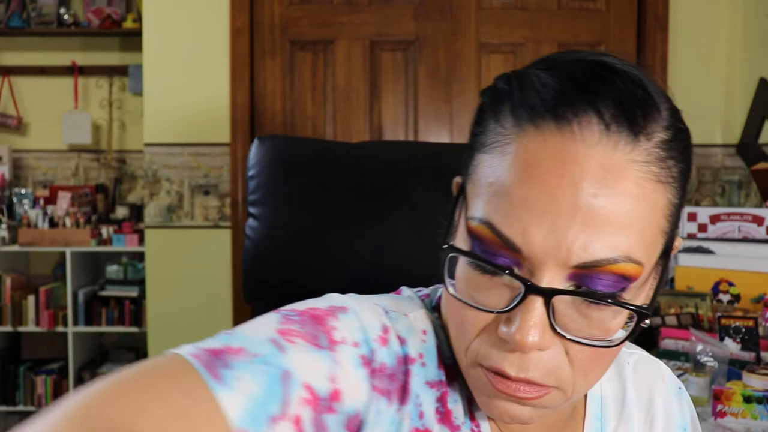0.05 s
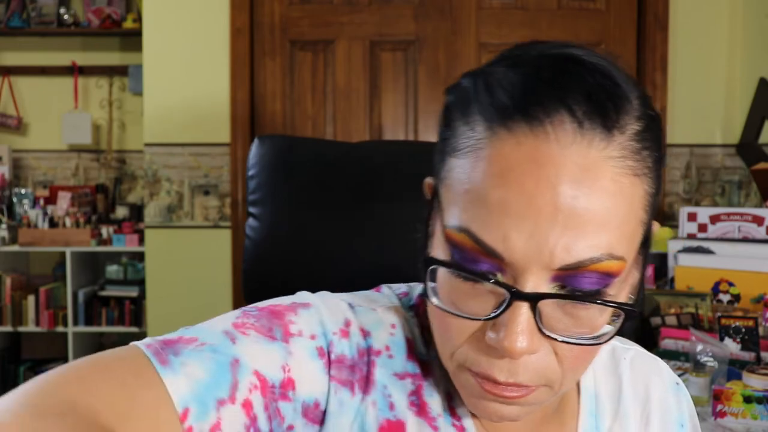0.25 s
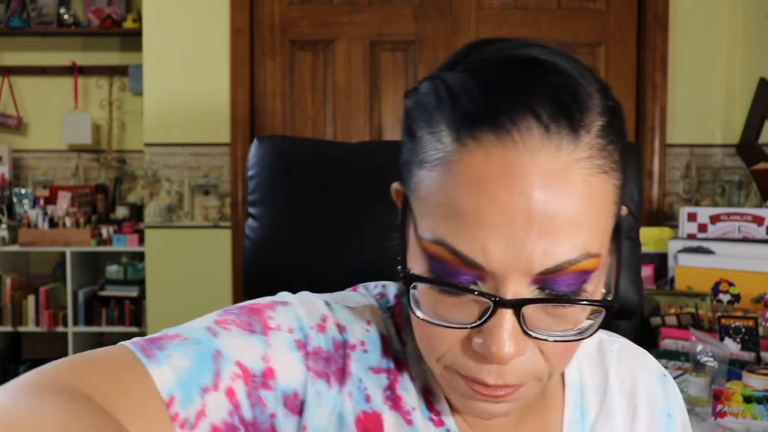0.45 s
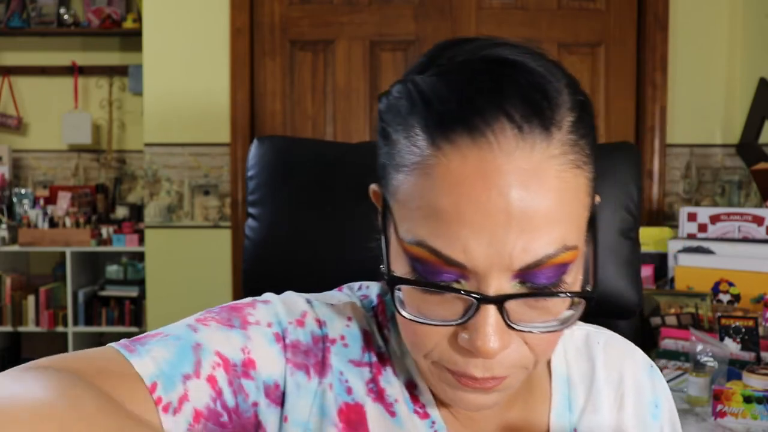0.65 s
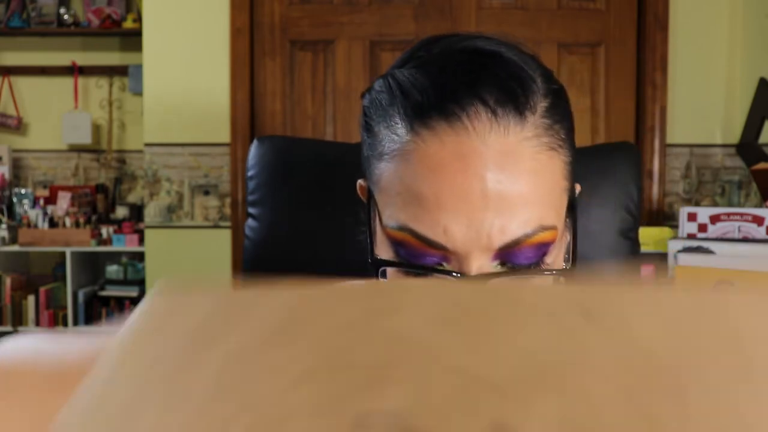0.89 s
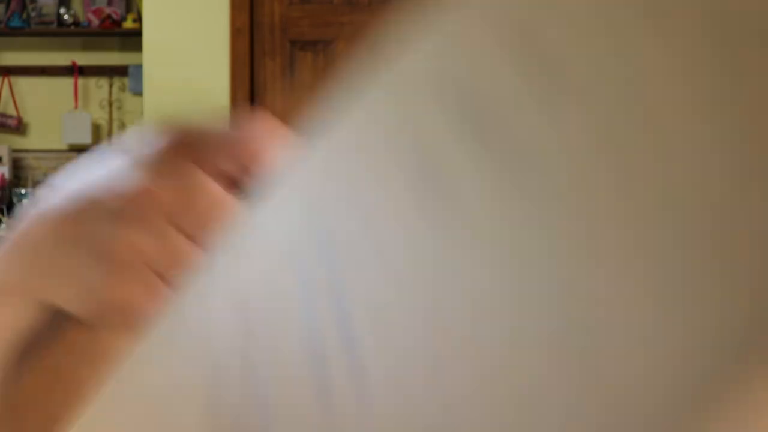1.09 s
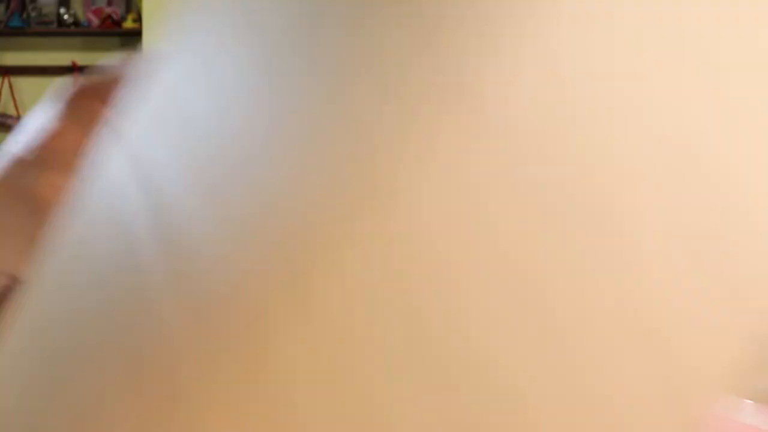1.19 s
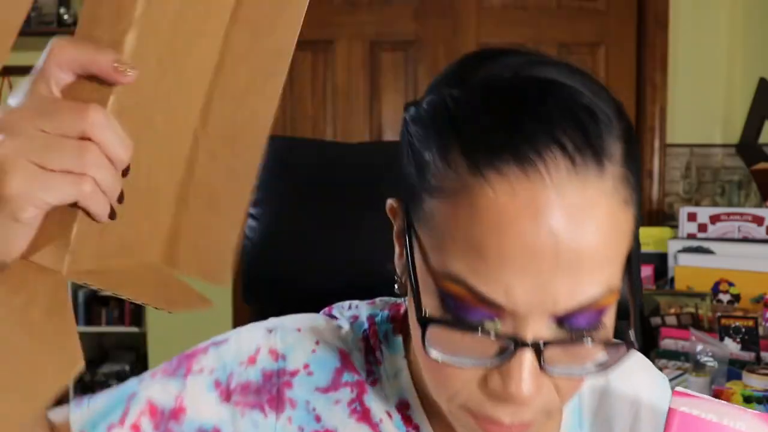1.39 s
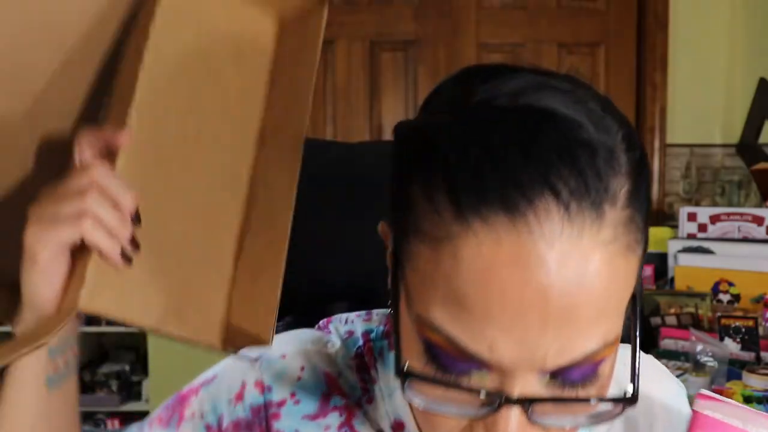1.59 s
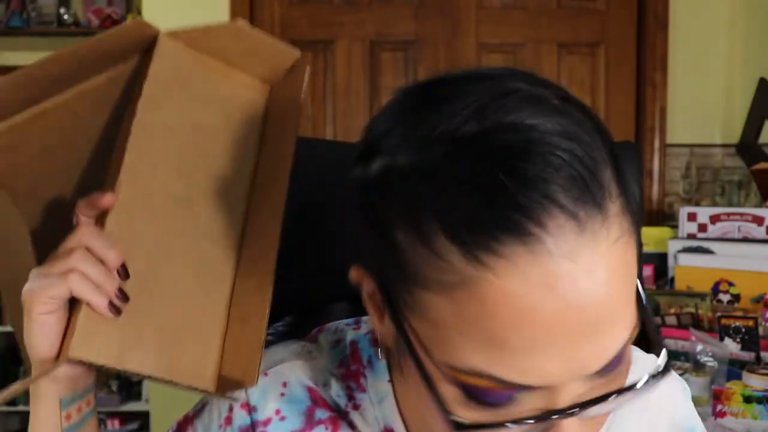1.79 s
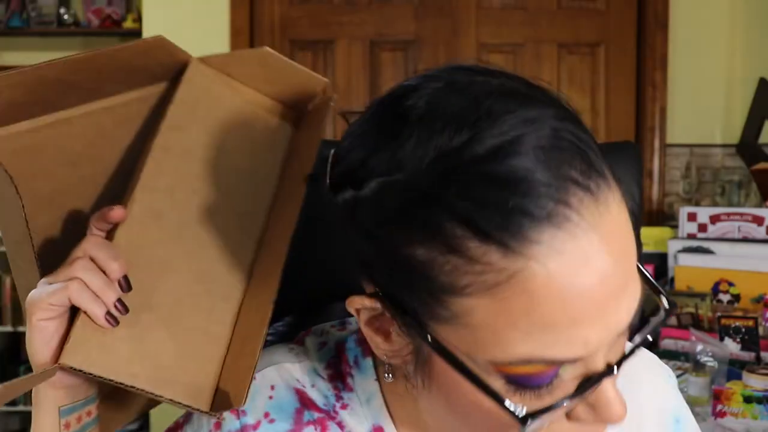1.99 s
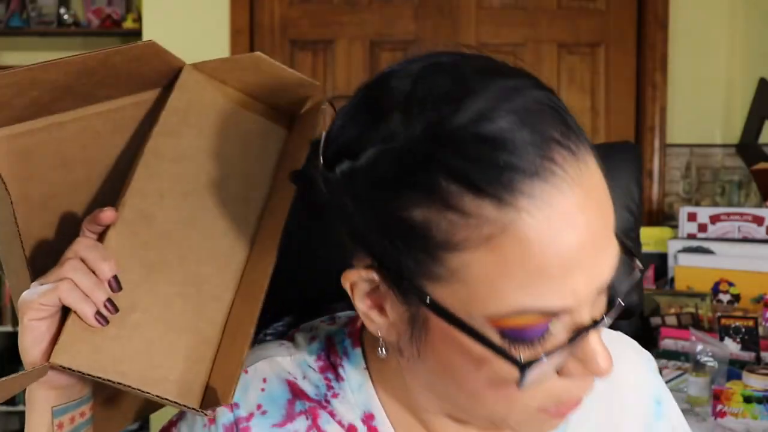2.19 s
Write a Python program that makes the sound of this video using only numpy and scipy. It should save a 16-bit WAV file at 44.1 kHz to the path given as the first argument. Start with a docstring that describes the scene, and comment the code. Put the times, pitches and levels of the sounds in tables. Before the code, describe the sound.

A cardboard box is handled close up in a small room. Light sliding and a knock at 0.2 seconds build into rasping scrapes, snaps and knocks from 0.4. A flap squeaks at 0.9. Just after 1 second come a double clack and a low puff of air, then a sharp tick at 1.2. Fingers tap faintly before a soft, hollow bump near 1.9. Faint hum and hiss lie underneath.

```python
"""Card slides over card, close to the microphone in a small furnished room: a cardboard box is being
worked open and rummaged in. Its slips rumble, rasp and hiss; edges judder, creases snap, panels knock
and buckle. A flap squeaks free, and the box is swung up with a double clack and a low puff of air.
Fingers shift their grip, and a last soft bump rebounds and sets the hollow box ringing.
Mains hum and a thin hiss lie underneath."""
import sys
import numpy as np
from scipy import signal
from scipy.fft import rfft, irfft
from scipy.io import wavfile

SR = 44100
rng = np.random.default_rng(int(sys.argv[2]) if len(sys.argv) > 2 else 0)


def unload_audio(sound):
    """Save the sound as a 16-bit wav file, at the path given as the first command line argument."""
    columns = np.transpose(np.atleast_2d(sound))
    # keep every value between -1 and 1, then stretch to whole-number steps
    steps = np.round(np.clip(columns, -1, 1) * 32767)
    wavfile.write(sys.argv[1], SR, steps.astype(np.int16))


N = 99225
T = np.arange(N) / SR

# modes of the hollow box: (frequency [Hz], relative level [dB], t60 [s])
HOLLOW_MODES = [(102.2,-2,0.39),(207,-3,0.28),(258.5,1.5,0.19),(343.7,2,0.31),(482.6,14,0.059),(1447,-12.5,0.34)]


def amp(db):
    """Decibels to gain."""
    return 10 ** (np.asarray(db) / 20)


def unit(x):
    """Scale to rms 1."""
    return x / np.sqrt(np.mean(x ** 2) + 1e-20)


def decay(age, t60):
    """Exponential decay that starts at age 0."""
    return (age >= 0) * np.exp(-np.log(1000) * np.maximum(age, 0) / t60)


def level(rows):
    """Gain through (time [s], level [dB]) points; dies away after the last one."""
    times, db = np.transpose(rows)
    return amp(np.interp(T, times, db)) * decay(np.maximum(T - times[-1], 0), t60=0.38)


def colour(x, points):
    """Filter x by (frequency [Hz], relative level [dB]) points, rolling off beyond them; rms 1."""
    hz, db = np.transpose(points)
    f = np.maximum(np.fft.rfftfreq(2 * N, 1 / SR), 1)
    gain = amp(np.interp(np.log(f), np.log(hz), db))
    roll_off = np.minimum(2 * f / hz[0], 1) * np.minimum(hz[-1] / f, 1) ** 2
    return unit(irfft(rfft(x, 2 * N) * gain * roll_off)[:N])


def noise(points):
    """Coloured noise, rms 1."""
    return colour(rng.standard_normal(N), points)


def drift(rate):
    """A random wander with about this many turns a second."""
    return np.interp(T * rate, np.arange(N), rng.standard_normal(N))


def slips(per_s, spread_db):
    """Friction as random clicks of uneven size and either sign."""
    slipping = rng.random(N) < per_s / SR
    sizes = amp(spread_db * np.minimum(rng.exponential(1, N), 5))
    return slipping * sizes * rng.choice([-1, 1], N)


def ring(start, hz, db, t60, rise_cycles=0.47):
    """One struck mode: it swells within its first cycle and dies away."""
    age = np.maximum(T - start, 0)
    swell = 1 - np.exp(-age * hz / rise_cycles)
    return amp(db) * swell * decay(age, t60) * np.sin(2 * np.pi * hz * age)


def body(modes):
    """Response of a body to one tap."""
    return sum(ring(0, *mode) for mode in modes)


def resonate(x, modes):
    """Drive a body's modes with x, keeping the level of a noisy drive."""
    return signal.fftconvolve(x, unit(body(modes)) / np.sqrt(N))[:N]


def strike(times, dbs, response):
    """Play a response at each time and level."""
    clicks = np.zeros(N)
    np.add.at(clicks, (times * SR).astype(int), amp(dbs))
    return signal.fftconvolve(clicks, response)[:N]


def sliding():
    """Card drags over card: coarse slips shake the panels, fine fibres hiss, and both together rasp."""
    # course of each layer: (time [s], relative level [dB])
    rumble_levels = [(0,-36.5),(.08,-36.5),(.2,-32.5),(.25,-22.5),(.3,-35),(.38,-41),(.415,-15),(.445,-36),(.48,-23.5),(.55,-25),(.6,-24),(.645,-38),(.67,-22),(.72,-27.5),(.75,-33),(.79,-23),(.85,-27.5),(.88,-28.5),(1.02,-42.5)]
    flex_levels = [(0,-73),(.38,-76),(.44,-27),(.475,-25),(.52,-25),(.585,-24.5),(.64,-29.5),(.7,-21.5),(.76,-28),(.83,-68),(.88,-70)]  # the whole box flexing slowly under the hand
    rasp_levels = [(0,-40.5),(.14,-43),(.175,-38.5),(.21,-43),(.235,-49),(.27,-48.5),(.385,-51),(.405,-31.5),(.44,-37),(.478,-39),(.49,-18),(.53,-33.5),(.6,-28.5),(.635,-48),(.7,-39.5),(.79,-39),(.83,-26),(.875,-46.5),(.94,-36.5),(1.0,-80)]
    hiss_levels = [(0,-42),(.12,-41.5),(.165,-37),(.225,-38),(.24,-76),(.31,-60),(.385,-46.5),(.41,-37.5),(.47,-37),(.51,-30),(.595,-29.5),(.63,-42),(.68,-36.5),(.715,-37.5),(.75,-34),(.825,-32.5),(.86,-46),(.92,-38.5),(.97,-62)]
    air_levels = [(.12,-70),(.17,-49),(.225,-44),(.25,-60),(.33,-50),(.38,-65)]  # airy top of the first slide
    brush_levels = [(1.0,-51),(1.026,-39.5),(1.12,-41.5),(1.19,-53.5),(1.27,-42),(1.33,-87),(1.54,-62),(1.6,-50.5),(1.7,-58),(1.79,-50),(1.85,-48.5),(1.9,-40),(2.0,-47.5),(2.06,-48),(2.15,-54),(2.25,-67)]  # faint brushing while the box is held up
    # their spectra: (frequency [Hz], relative level [dB])
    rumble_colour = [(90,-6.5),(180,-1.5),(330,5.5),(490,-1.5),(600,-2),(900,-48)]
    flex_colour = [(45,-11),(85,-2.5),(130,3),(190,5.5),(280,-5)]
    rasp_colour = [(450,-6.5),(620,-25),(740,5),(880,2.5),(1100,-1.5),(1250,-6),(1420,0),(1650,-15.5),(2100,-8),(3000,-27),(5000,-33)]
    hiss_colour = [(1200,-2),(2500,1.5),(3700,2),(4500,-2.5),(5400,-0.5),(7000,-4.5),(10000,-7.5),(16000,-19.5)]
    air_colour = [(6000,-18),(10000,-6),(13000,7),(16000,-2)]
    brush_colour = [(150,-8),(500,3),(1500,-3),(2300,-3.5),(3500,-4.5),(6000,-11),(10000,-17.5),(16000,-22)]
    # resonances the rubbing keeps ringing: (frequency [Hz], relative level [dB], t60 [s])
    rub_modes = [(365,-6,0.16),(518.6,3.5,0.23),(717,9,0.16),(847,0,0.068),(973,-7.5,0.12),(1390,-5,0.1),(2040,2,0.062),(2800,-3,0.041)]
    rumble_db, rasp_db, rub_db, clump_db = -2.5, 4, -1, 2
    coarse = slips(per_s=900, spread_db=3)
    fine = slips(per_s=8000, spread_db=0.5) * amp(clump_db * drift(150))
    drag = unit(unit(coarse) + unit(fine))
    rumble = amp(rumble_db) * level(rumble_levels) * colour(coarse, rumble_colour)
    flex = level(flex_levels) * noise(flex_colour)
    rasp = amp(rasp_db) * level(rasp_levels) * colour(drag, rasp_colour)
    ringing = amp(rub_db) * resonate(level(rasp_levels) * drag, rub_modes)
    hiss = level(hiss_levels) * colour(fine, hiss_colour)
    air = level(air_levels) * noise(air_colour)
    brush = level(brush_levels) * colour(fine, brush_colour)
    return rumble + flex + rasp + ringing + hiss + air + brush


def background():
    """Room tone: mains hum and a thin, steady hiss."""
    # hum partials: (frequency [Hz], rms level [dB])
    partials = [(59.9,-41),(180,-57)]
    # noise floor: (frequency [Hz], relative level [dB])
    floor_colour = [(30,2),(100,2.5),(250,1),(450,-7.5),(1300,-12),(2300,-22.5),(2900,-11),(3400,-7),(4000,-26),(4800,-18),(5450,-4),(6300,-23.5),(16000,-31)]
    hum = sum(amp(db) * np.sqrt(2) * np.sin(2 * np.pi * (hz * T + rng.random())) for hz, db in partials)
    return hum + amp(-47) * noise(floor_colour)


def judders():
    """A sliding edge judders for a moment around one unsteady pitch, swelling and fading."""
    # edge judders: (middle time [s], length [s], pitch [Hz], level [dB])
    events = [(0.17,0.026,1080,-31),(0.52,0.062,750,-17.5),(0.547,0.039,1430,-27.5),(0.54,.09,3600,-34.5),(.585,0.017,2400,-34)]
    tones = 0
    for middle, length, hz, db in events:
        pitch = hz * (1 + 0.047 * drift(hz / 2))
        swell = np.exp(-(2 * (T - middle) / length) ** 2)
        tones += amp(db) * swell * np.sin(2 * np.pi * np.cumsum(pitch) / SR)
    return tones


def snaps():
    """A crease gives with one sharp tick, a little tearing of fibres and a short bright crackle."""
    # creases giving: (time [s], tick level [dB], crackle level [dB])
    creases = [(0.2273,-35,-23.5),(0.402,-42,-27.5),(0.486,-29,-18.5),(0.528,-36,-23),(0.8932,-37,-28),(0.8949,-29,-18.5),(0.9337,-29,-27.5),(1.0344,-20,-18.5),(1.0466,-28,-22.5),(1.2245,-4.5,-23),(1.2280,-40,-23),(1.771,-43,-49),(1.877,-38,-29.5),(1.889,-33,-37),(1.913,-46,-33),(1.964,-32,-39)]
    # spectra of tick and crackle: (frequency [Hz], relative level [dB])
    tick_colour = [(2000,1),(6000,-6),(13500,4),(17000,0.5)]
    crackle_colour = [(300,-9),(1300,-8),(1950,-0.5),(2300,-7),(2800,-1.5),(4300,-9.5),(7000,-18),(16000,-35)]
    times, tick_db, crackle_db = np.transpose(creases)
    fraying = amp(-23) * decay(T, t60=0.003) * rng.standard_normal(N)
    ticks = strike(times, tick_db, signal.unit_impulse(N) + fraying)
    crackle = strike(times, crackle_db, decay(T, t60=0.032)) * noise(crackle_colour)
    return np.std(ticks) * colour(ticks, tick_colour) + crackle


def patch(start, hz, db, t60):
    """A small struck patch of card flexes at its own pitch and radiates little bass."""
    low_cut = signal.butter(2, np.clip(0.48 * hz, 20, 5000), "high", fs=SR, output="sos")
    return signal.sosfilt(low_cut, ring(start, hz, db, t60) + 1e-18)


def knocks():
    """Each knock flexes one patch, shakes the panel, cracks the fibres and rings the hollow box."""
    # knocks and buckles: (time [s], patch pitch [Hz], patch gain [dB], patch t60 [s],
    # panel gain [dB], crack gain [dB], hollow box gain [dB])
    hits = [ (0.231, 379, 9, 0.022, -15.5, -20, -33), (0.2313, 783, 2, 0.025, -54, -41, -35),
            (0.24, 435, -25, 0.012, -13, -59, -68), (.4080, 365, -8, 0.028, -16.5, -34, -35),
            (0.412, 171, -18, 0.18, -21, -48, -52), (0.462, 434, -8, 0.011, -13, -34, -40),
            (0.469, 79, -10.5, 0.12, -29, -44, -56), (0.481, 168, -14, .05, -36, -47, -28),
            (0.487, 830, -3, 0.023, -28, -15.5, -60), (0.585, 218, -14, 0.031, -16, -36, -51),
            (.6110, 1064, 2.5, 0.031, -8.5, -15, -40), (0.6199, 290, 5.5, 0.0077, -50, -51, -59),
            (0.6904, 271, -9, 0.035, -15, -27, -36), (0.806, 390, -18, 0.032, -32, -32, -60),
            (0.8254, 393, -13.5, 0.084, -21.5, -25, -65), (0.841, 335, -6.5, 0.051, -23, -48, -57),
            (1.0333, 134, 6.5, 0.017, -9, -14, -27), (1.0512, 307, -9.5, 0.036, -17, -16.5, -25.5)]
    # damped modes of a cardboard panel: (frequency [Hz], relative level [dB], t60 [s])
    panel_modes = [(290,12,0.016),(447,-2,0.061),(733,-9,0.043),(825,-3.5,0.014),(996,-11.5,0.092),(1325,-14,0.078),(1544,-11.5,0.028),(3700,-12.5,0.01)]
    # cracking fibres: (frequency [Hz], relative level [dB])
    crack_colour = [(400,8),(1000,3),(2500,-5.5),(3800,-16),(5500,-16),(8000,-19.5),(16000,-30.5)]
    times, _, _, _, panel_db, crack_db, hollow_db = np.transpose(hits)
    patches = sum(patch(*hit[:4]) for hit in hits)
    cracks = strike(times, crack_db, decay(T, t60=0.039)) * noise(crack_colour)
    panel = body(panel_modes)
    tunings = 1 + 0.044 * rng.uniform(-1.05, 1, len(times))  # the grip retunes the panel at each knock
    panels = sum(amp(db) * np.interp((T - start) * tuning, T, panel)
                 for start, db, tuning in zip(times, panel_db, tunings))
    return patches + panels + strike(times, hollow_db, body(HOLLOW_MODES)) + cracks


def squeak():
    """The flap sticks and slips in two firm, rough tones that shake the box and ring out on release."""
    # the flap's tones: (start [s], pitch [Hz], level [dB], attack [s], hold [s], t60 [s])
    flap_tones = [(0.8958, 732, -7.5, 0.0008, .017, 0.084), (0.901, 999, -15.5, 0.0096, 0.019, 0.045)]
    tones, shake = 0, 0
    for start, hz, db, attack, hold, t60 in flap_tones:
        age = T - start
        pitch = hz * (1 + 0.032 * drift(300))
        phase = 2 * np.pi * np.cumsum(pitch * (age > 0)) / SR
        envelope = np.clip(age / attack, 0, 1) * decay(np.maximum(age - attack - hold, 0), t60)
        roughness = 1 + 0.36 * drift(400)
        tones += amp(db) * envelope * roughness * np.sin(phase)
        shake += envelope * rng.standard_normal(N)
    return tones + amp(-24.5) * resonate(shake, HOLLOW_MODES[1:4])


def clacks():
    """As the box swings up, its stiff folded wall is hit twice and rings like thin wood."""
    # hits on the wall: (time [s], gain [dB])
    hits = [(1.0338,-18),(1.0502,-24)]
    # the wall's modes: (frequency [Hz], relative level [dB], t60 [s])
    wall_modes = [(974,-2.5,0.06),(1518,0,0.063),(1710,-17,0.31),(1970,-3,0.041),(2450,0,0.025)]
    return strike(*np.transpose(hits), body(wall_modes))


def puff():
    """Air pushed by the swung box reaches the microphone as one deep, fading throb."""
    return ring(start=1.036, hz=40.7, db=-22.5, t60=0.76)


def taps():
    """Fingers shift their grip: soft tips land on the card with a short dull scuff."""
    # fingertips landing: (time [s], level [dB])
    touches = [(1.611,-56),(1.670,-46.5),(1.726,-43),(1.758,-44.5),(1.815,-52)]
    # their scuff: (frequency [Hz], relative level [dB])
    scuff_colour = [(400,0),(1200,0),(2200,-24)]
    return strike(*np.transpose(touches), decay(T, t60=0.062)) * noise(scuff_colour)


def bumps():
    """The empty raised box bumps softly, rebounds and hums on."""
    # the bump, its rebounds and a later second touch: (time [s], gain [dB])
    hits = [(1.8697,-20.5),(1.879,-23),(1.9035,-26),(1.966,-32.5),(2.038,-42)]
    # modes of the raised box: (frequency [Hz], relative level [dB], t60 [s])
    box_modes = [(96.1,-20.5,0.96),(193,4,0.088),(211.7,-4.5,0.44),(237,8.5,0.051),(337,-10,0.2),(514,-6.5,0.11),(637,-5.5,0.093),(745,-19.5,0.6),(830,2.5,0.031),(984,-17,0.2),(2090,-22,0.33)]
    return strike(*np.transpose(hits), body(box_modes))


def room(x):
    """The small furnished room answers with a short diffuse tail."""
    # the tail's spectrum: (frequency [Hz], relative level [dB])
    tail_colour = [(60,2),(400,5.5),(1500,11),(4000,10.5),(9000,-14)]
    delay_s, tail_db = 0.014, -21.5
    tail = noise(tail_colour) * decay(T - delay_s, t60=0.3)
    return amp(tail_db) * signal.fftconvolve(x, unit(tail) / np.sqrt(N))[:N]


def scene():
    """The handled box close to one microphone, with the room faint behind it."""
    box = sliding() + judders() + snaps() + knocks() + squeak() + clacks() + taps() + bumps()
    return (box + room(box) + puff() + background())[None]


def record(dry):
    """The loudest peaks clip flat, and the highest treble is cut."""
    ceiling, stopband_hz = 0.97, 17100
    low_pass = signal.cheby2(16, 70, stopband_hz, fs=SR, output="sos")
    return signal.sosfilt(low_pass, np.clip(dry, -ceiling, ceiling))


dry = scene()
out = record(dry)
unload_audio(out)
```